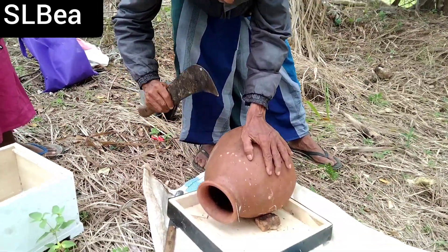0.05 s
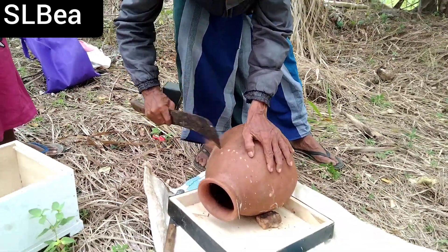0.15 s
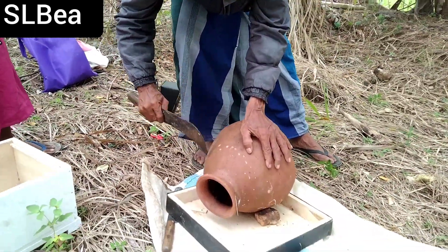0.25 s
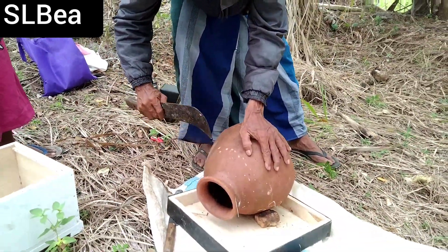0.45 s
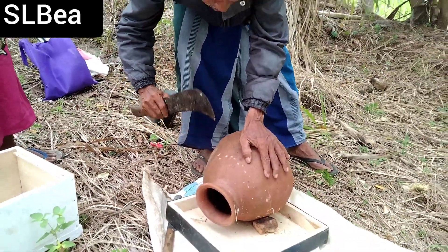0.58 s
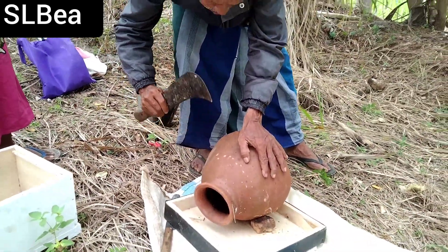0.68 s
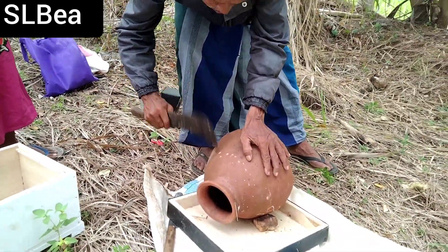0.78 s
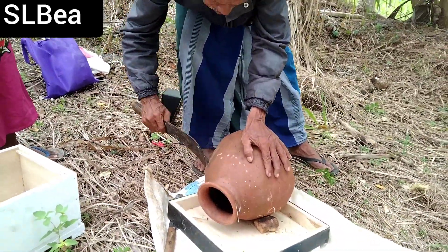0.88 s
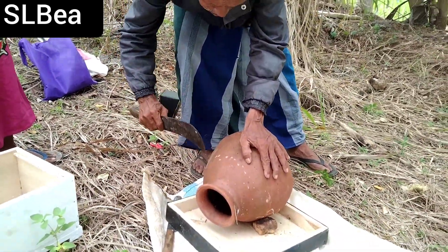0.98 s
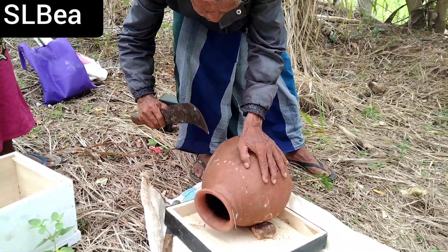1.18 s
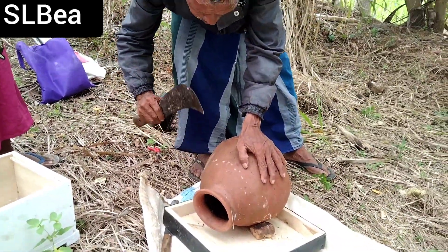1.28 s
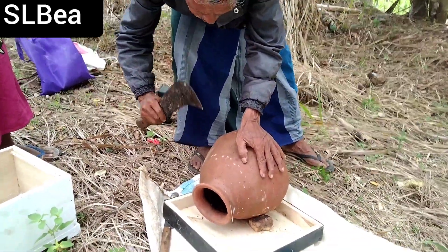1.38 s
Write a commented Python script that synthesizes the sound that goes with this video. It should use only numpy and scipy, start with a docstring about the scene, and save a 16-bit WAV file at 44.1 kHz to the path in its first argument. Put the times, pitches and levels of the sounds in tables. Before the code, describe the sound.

A heavy blade knocks twice on a clay pot, each blow a sharp crack with a short ring that slightly overloads the microphone. The outdoor surroundings are quiet, with faint straw rustling and a tiny bird chirp after the second knock.

```python
"""Two hard knocks, each a crack and a short ring: a heavy blade on a hand-steadied clay pot, outdoors.
Each blow lands on its own spot and sets the clay wall and the blade ringing; nearby things scatter it
and a faint tail from the trees dies away, cut short by a quick fade. A small bird chirps, dry straw
rustles and snaps, and a low far rumble lies underneath. The blows overload the microphone."""
import sys
import numpy as np
from scipy import signal
from scipy.fft import rfft, irfft
from scipy.io import wavfile

SR = 44100
rng = np.random.default_rng(int(sys.argv[2]) if len(sys.argv) > 2 else 0)


def waveform_to_disk(signal):
    """Save audio, clipped to [-1, 1], as 16-bit WAV at the path in sys.argv[1]."""
    frames = np.transpose(np.atleast_2d(signal))
    scaled = np.clip(frames, -1, 1) * 32767
    samples = np.round(scaled).astype(np.int16)
    wavfile.write(sys.argv[1], SR, samples)


N = 63945
T = np.arange(N) / SR
HZ = np.maximum(np.fft.rfftfreq(N, 1 / SR), 1)
CRACK_RISE_S, RING_RISE_S = 0.00047, 0.00068


def from_db(db):
    """Decibels to gain."""
    return 10 ** (np.asarray(db) / 20)


def noise(spectrum_db):
    """Noise of rms 1 with the given spectral shape."""
    x = irfft(rfft(rng.standard_normal(N)) * from_db(spectrum_db), N)
    return x / x.std()


def eq_noise(curve, spot=0):
    """Noise of rms 1 through an EQ curve drawn over log frequency; spot picks the level column."""
    curve = np.array(curve)
    return noise(np.interp(np.log(HZ), np.log(curve[:, 0]), curve[:, spot + 1]))


def strike(start, rise, t60):
    """Envelope with a quick attack and an exponential decay."""
    age = np.maximum(T - start, 0)
    return (1 - np.exp(-age / rise)) * np.exp(-np.log(1000) * age / t60)


def swell(middle, length):
    """Bell-shaped fade in and out."""
    return np.exp(-2 * ((T - middle) / length) ** 2)


def far_rumble():
    """A bed of distant rumble and faint air that slowly rises and sinks."""
    # rumble and air EQ: f/Hz, relative level/dB
    colour = [(30, -34), (60, -21), (100, -11), (140, -10.5), (175, 4.5), (215, -5.5), (270, -28),
              (400, -37), (520, -29.5), (700, -39), (2000, -34.5), (8000, -44), (16000, -47)]
    # fader ride: t/s, level/dB
    ride = [(0, -74), (.2, -66.5), (.5, -65), (.7, -70), (.83, -76), (1.0, -73), (1.2, -64.5), (1.45, -71)]
    return from_db(np.interp(T, *np.transpose(ride))) * eq_noise(colour)


def bird(blur_depth=0.89, blur_hz=129.3):
    """Thin whistles, each an arch of pitch, blurred by distance."""
    # chirps: start t/s, length/s, top f/Hz, drop at the ends/Hz, level/dB
    chirps = [(1.053, .078, 5950, 950, -67), (1.229, .022, 6500, 900, -64), (1.257, .014, 6500, 600, -72),
              (1.273, .016, 6600, 500, -74)]
    out = 0
    for start, length, top_hz, drop_hz, db in chirps:
        along = np.clip(2 * (T - start) / length - 1, -1, 1)
        phase = 2 * np.pi * np.cumsum(top_hz - drop_hz * along ** 2) / SR
        out += from_db(db) * np.sqrt(1 - along ** 2) * np.sin(phase)
    flutter = noise(-20 * np.log10(1 + (HZ / blur_hz) ** 2))
    return out * (1 + blur_depth * flutter)


def straw_rustle(grain_db=5.5, grains_per_s=250):
    """Dry straw shifts in soft, grainy swells of band noise."""
    # rustles and shuffles: middle t/s, length/s, centre f/Hz, half-width/octaves, level/dB
    rustles = [(0.106, 0.091, 12500, 0.28, -79), (0.14, 0.12, 7380, 0.27, -67.5),
               (.01, 0.021, 7460, 0.23, -74), (.165, 0.012, 88.5, 0.4, -61.5), (.17, .09, 526.4, 0.16, -86),
               (1.26, 0.072, 12000, .4, -80), (1.322, 0.027, 11500, 0.42, -69),
               (1.322, 0.039, 2580, 1, -72), (1.41, 0.1, 10930, .2, -82)]
    grain_times = np.arange(4000) / grains_per_s
    out = 0
    for middle, length, hz, octaves, db in rustles:
        grain = from_db(grain_db * np.interp(T, grain_times, rng.standard_normal(len(grain_times))))
        band = noise(-20 * np.log10(1 + (np.log2(HZ / hz) / octaves) ** 4))
        out += from_db(db) * band * grain * swell(middle, length)
    return out


def stalk_snaps():
    """Single stalks snap, each a tiny burst of bright noise."""
    # snaps: t/s, level/dB
    snaps = [(.078, -59), (0.102, -63.5), (.367, -52), (1.321, -66)]
    # snap EQ: f/Hz, relative level/dB
    colour = [(1000, -41), (5000, -3), (8000, 13), (12000, -3), (16000, -13)]
    return eq_noise(colour) * sum(from_db(db) * strike(t, CRACK_RISE_S, t60=0.019) for t, db in snaps)


def faint_pips():
    """Brief, barely audible pure tones."""
    # pips: middle t/s, length/s, f/Hz, level/dB
    pips = [(.105, 0.013, 2080, -80), (0.171, 0.016, 1990, -82.5), (.571, 0.0082, 2272, -61),
            (.615, 0.027, 2230, -76)]
    return sum(from_db(db) * swell(t, length) * np.sin(2 * np.pi * hz * T) for t, length, hz, db in pips)


def blade_graze(half_width_hz=56):
    """The blade rings softly as it is moved: narrow bands of noise in one swell."""
    # blade resonances: f/Hz, level/dB
    bands = [(1375, -76), (1870, -83), (2260, -80)]
    shimmer = sum(from_db(db) * noise(-20 * np.log10(1 + ((HZ - hz) / half_width_hz) ** 2))
                  for hz, db in bands)
    return shimmer * swell(middle=1.323, length=0.075)


def tree_tail(rings, start, wash_db, t60, gate_after_s, spot):
    """Diffuse ring echo and a noise wash, both cut short by a quick fade, like a noise gate closing."""
    # wash EQ: f/Hz, relative level/dB for blow 1, for blow 2
    colour = [(99.9, -3, -15), (224, 3.5, 3), (358, -5.5, -8), (513.7, 1.5, -7), (790, 9, -3),
              (1170, -9, -6), (1340, 5, 12.5), (2150, 8.5, 1.5), (2500, 2.5, 1.5), (2970, -2, 8.5),
              (3560, 4.5, -5.5), (4730, -10, -11), (8100, -6, -6), (9400, -20, -25), (15000, -27.5, -29)]

    def decay(onset):
        fade = np.exp(-np.maximum(T - onset - gate_after_s, 0) / 0.035)
        return strike(onset, rise=0.02, t60=t60) * fade

    response = rng.standard_normal(N) * decay(0)
    ring_echo = from_db(-28.5) * signal.fftconvolve(rings, response / np.linalg.norm(response))[:N]
    return ring_echo + from_db(wash_db) * eq_noise(colour, spot) * decay(start)


def near_scatter(direct, spot, end_s=0.056, fade_s=0.008):
    """Dense early reflections off ground, boxes and people that stop abruptly."""
    # reflection EQ: f/Hz, relative level/dB for blow 1, for blow 2
    colour = [(100, -1.5, 3.5), (350, -6, -2), (770, 2.5, 10.5), (1060, -1.5, -4), (1360, 0.5, 7),
              (1700, -7, -4.5), (2600, 1, -2.5), (3250, -2, -5.5), (7000, 0, -2), (14100, 0.5, 0.5)]
    gate = np.exp(-np.maximum(T - end_s, 0) / fade_s)
    response = eq_noise(colour, spot) * strike(start=0.014, rise=0.0022, t60=0.7) * gate
    return signal.fftconvolve(direct, response / np.linalg.norm(response))[:N]


def ring(modes, start, spot):
    """Decaying modes of alternating sign, as strong as the struck spot makes them."""
    out = 0
    for k, (hz, t60, *db) in enumerate(modes):
        tone = (-1) ** k * np.sin(2 * np.pi * hz * (T - start))
        out += from_db(db[spot]) * strike(start, RING_RISE_S, t60) * tone
    return out


def crack(start, t60, spot):
    """Blade meets clay: a gritty burst of noise with a weak, slower part under it."""
    # crack EQ: f/Hz, relative level/dB for blow 1, for blow 2
    colour = [(40, -6.5, -32.5), (161.9, -9, -9), (400, -3.5, -5.5), (760, 0.5, -1), (1200, -7.5, -6),
              (1852, 3, 4), (3020, 3, -1), (4300, -11, -16), (7200, -9, -2.5), (9500, -18.5, -24.5),
              (15000, -29.5, -27.5)]
    fast = strike(start, CRACK_RISE_S, t60)
    slow = from_db(-25.5) * strike(start, CRACK_RISE_S, t60=0.056)
    return from_db(-9.5) * eq_noise(colour, spot) * (fast + slow)


def knocks(low_cut_hz=70):
    """Each blow layers a crack, the ring of pot and blade, and the answer of the surroundings."""
    # blows, each on its own spot of the wall: t/s, crack trim/dB, crack t60/s, scatter send/dB,
    # tail wash level/dB, tail t60/s, time until the tail is gated/s
    blows = [(0.2435, 2.5, .022, -13, -39, 0.59, .31), (0.8952, 3, 0.025, -14, -38.5, 0.64, .36)]
    # modes of the clay wall: f/Hz, t60/s, level/dB in blow 1, in blow 2
    pot_modes = [(169, 0.14, -32.5, -36), (335, 0.056, -31.5, -27), (595, .04, -16.5, -20.5),
                 (690, 0.039, -15.5, -22), (779.7, .06, -10.5, -26), (1049, 0.025, -25.5, -17.5),
                 (1624.6, .031, -5, -5.5), (1842, 0.055, -9.5, -7), (1983, .04, -11, -9.5),
                 (2140, 0.029, -5.5, -21.5), (2282, .03, -20, -10), (2413, .04, -13.5, -22),
                 (2614, .035, -20.5, -9), (2853, .022, -23, -11.5), (3206, 0.031, -16, -11),
                 (3330, .04, -22, -20.5)]
    # faint, lasting modes of the blade: f/Hz, t60/s, level/dB in blow 1, in blow 2
    blade_modes = [(740, .3, -39.5, -50), (1388, .5, -58, -42.5), (1434, 0.45, -44.5, -35),
                   (1970, 0.46, -43.5, -41.5), (2480, .4, -54, -52)]
    # bright, short modes of the blade edge: f/Hz, t60/s, level/dB in blow 1, in blow 2
    edge_modes = [(3778, .045, -25, -40), (5560, .02, -21, -21), (6250, .016, -20, -19),
                  (6610, .02, -30, -11), (7400, .032, -23, -21), (7620, .032, -27, -23)]
    out = 0
    for spot, (start, crack_db, crack_t60, near_db, wash_db, tail_t60, gate_after_s) in enumerate(blows):
        rings = ring(pot_modes, start, spot) + ring(blade_modes, start, spot)
        edge = ring(edge_modes, start, spot)
        direct = from_db(crack_db) * crack(start, crack_t60, spot) + rings + edge
        near = from_db(near_db) * near_scatter(direct, spot)
        out += direct + near + tree_tail(rings, start, wash_db, tail_t60, gate_after_s, spot)
    return signal.sosfilt(signal.butter(2, low_cut_hz, "high", fs=SR, output="sos"), out)


def scene():
    """Mono mix of the knocks over the quiet outdoors."""
    mix = far_rumble() + knocks() + bird() + straw_rustle() + stalk_snaps() + faint_pips() + blade_graze()
    return mix[None]


def record(dry, drive_db=1, cutoff_hz=15700):
    """The overloaded microphone flattens the loudest peaks; a steep low-pass cuts the top."""
    driven = dry * from_db(drive_db)
    flattened = driven / (1 + driven ** 6) ** (1 / 6)
    return signal.sosfilt(signal.ellip(10, 0.1, 70, cutoff_hz, fs=SR, output="sos"), flattened)


dry = scene()
out = record(dry)
waveform_to_disk(out)
```